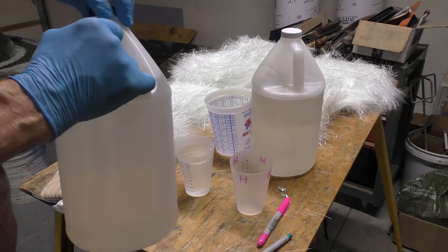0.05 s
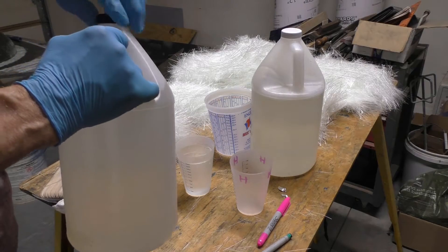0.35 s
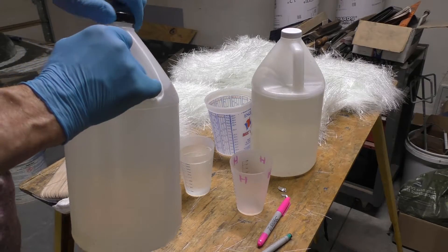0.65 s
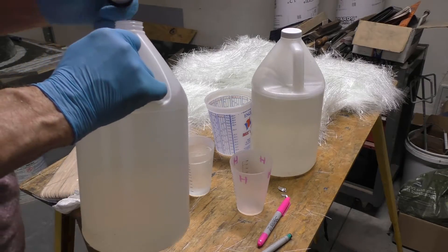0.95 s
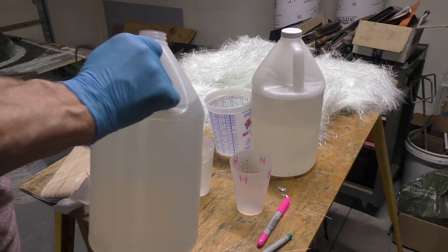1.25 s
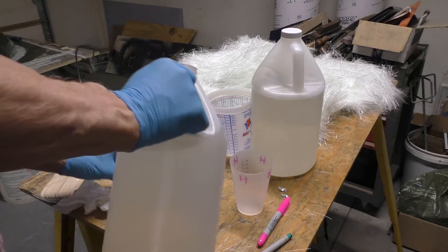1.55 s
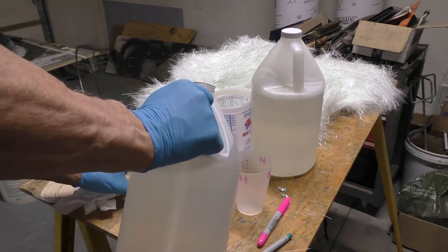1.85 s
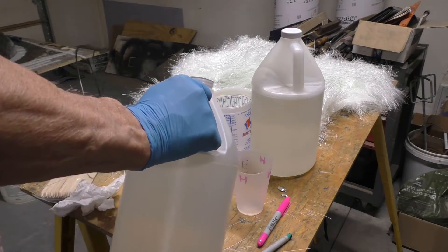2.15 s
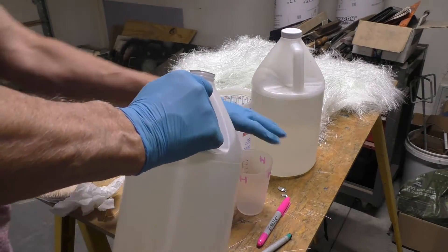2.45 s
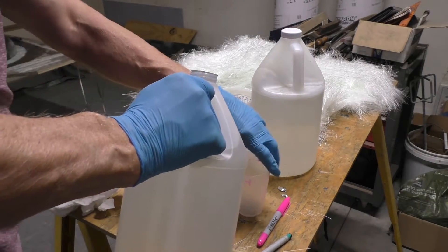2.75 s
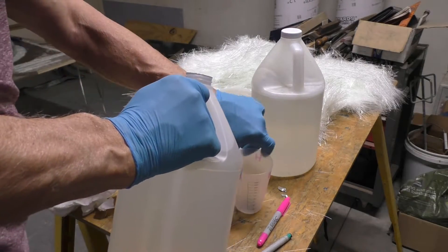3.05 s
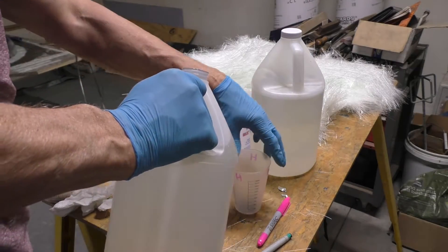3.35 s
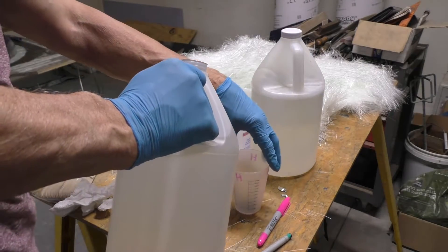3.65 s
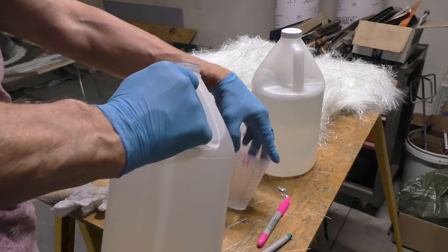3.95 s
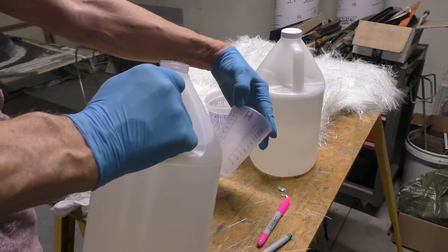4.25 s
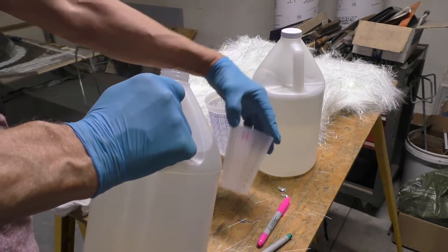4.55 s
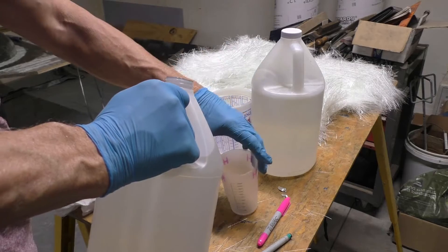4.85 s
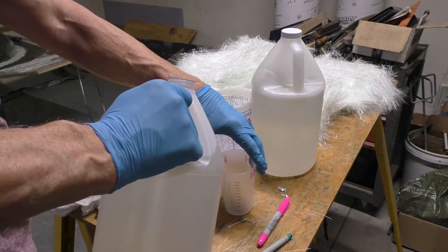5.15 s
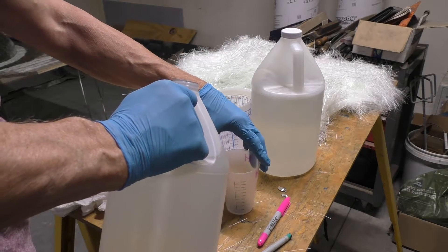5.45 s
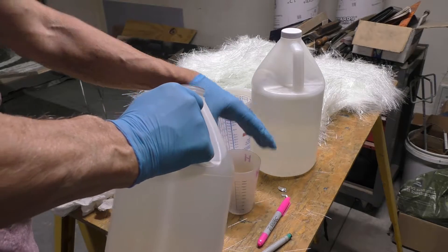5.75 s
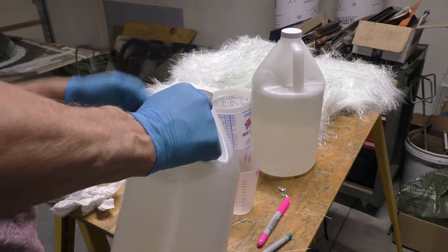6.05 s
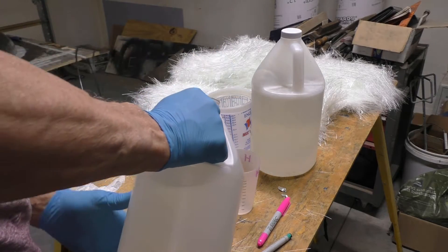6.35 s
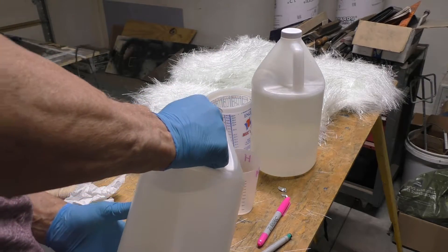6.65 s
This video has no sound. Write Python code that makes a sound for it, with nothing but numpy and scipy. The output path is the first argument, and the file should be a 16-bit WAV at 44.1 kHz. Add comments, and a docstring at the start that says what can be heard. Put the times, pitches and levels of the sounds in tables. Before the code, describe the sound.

Gloved hands softly rub and tap a plastic jug as its cap comes off. The cap clatters briefly on a wooden bench, and a glove gives a tiny squeak. A plastic cup scrapes over grit, bumps the jug, then lands with one firm, hollow knock, the loudest sound. Faint rubber crackles follow. It is all heard close by in a slightly echoing workshop with a low, steady hum.

```python
"""Jug and mixing cup on a workbench

Gloved hands take the cap off a plastic jug, rubbing round its neck, and drop it clattering on a
wooden bench. A mixing cup slides on fizzing grit, bumps the jug, is lifted and lands with one firm,
hollow knock. Each hit rings the object's modes; each scrape is a stream of tiny slips. Gloves crackle
and sleeves swish, while the workshop rings briefly over a bed of air and low hum."""
import sys
import numpy as np
from scipy import signal
from scipy.fft import rfft, irfft
from scipy.io import wavfile
from scipy.ndimage import uniform_filter1d

SR = 44100
rng = np.random.default_rng(int(sys.argv[2]) if len(sys.argv) > 2 else 0)


def output_pcm(signal):
    """Save a mono or channel-first signal as 16-bit PCM at the path in sys.argv[1].

    Samples are clipped to [-1, 1] before scaling.
    """
    pcm = np.clip(np.atleast_2d(signal).T, -1, 1) * 32767
    wavfile.write(sys.argv[1], SR, np.round(pcm).astype(np.int16))


N = 304290
TIME = np.arange(N) / SR

HOLLOW_HZ = 782  # the note of the cup's hollow
# The ring of the cup, cap and jug. Each row: pitch in Hz, level in dB, seconds to fall 60 dB.
CUP_MODES = [(250, -18, 0.052), (366, -9, 0.07), (460, -15, 0.042), (490, -12.5, .05), (930, -13, 0.019),
             (820, -9, 0.056), (HOLLOW_HZ, -0.45, 0.12), (810, -6.5, 0.089), (1200, -10, .05),
             (1180, -1.5, 0.02), (1281, -1.5, 0.032), (1420, -5, 0.0244), (1400, -12, 0.02),
             (2050, -7.5, 0.022), (3200, -19, .025), (3000, -6.5, .022), (3980, -13.5, .025),
             (3000, -18.5, 0.036)]
CAP_MODES = [(400, -8.5, 0.052), (547, -11.5, 0.04), (818, -4.5, 0.037), (1010, 5.5, 0.026),
             (1300, -1, 0.016), (1650, -5, 0.011), (2590, -1.5, 0.024), (4350, -20, .015)]
JUG_MODES = [(263, -15, 0.065), (350, -2.5, 0.066), (468, 1.5, 0.042), (541, -2.5, 0.052),
             (980, -3.5, 0.024), (1170, -13.5, 0.029), (1650, -7, 0.036), (2720, -20, .015)]
# Each object's body, a crowd of fast-dying modes. Each row: frequency in Hz, relative level in dB.
CUP_BODY = [(80, -22), (200, -9.5), (400, -0.5), (900, 8.5), (1600, -4.5), (2150, -4.5), (2700, -15.5),
            (3500, -1), (4300, -7), (5200, -10.5), (6200, -29.5), (8500, -14), (16000, -44.5)]
CAP_BODY = [(120, -30), (400, -8.5), (1200, 2.5), (2000, -7), (3000, -8.5), (4200, -13.5), (5300, -13.5),
            (6300, -23), (8000, -11.5), (16000, -42)]
JUG_BODY = [(100, 8), (280, 2.5), (600, -2), (1300, 1), (2200, -10), (3000, -3), (4600, -10), (6000, -31),
            (9000, -40), (16000, -28)]

# Hits. Each row: start in seconds, level in dB, contact time in milliseconds.
CUP_KNOCKS = [(3.1995, -43.5, 0.86), (3.915, -63, 0.34), (4.7953, -17, 0.51), (4.7962, -39, 0.12),
              (4.7978, -22.5, 0.81), (4.8032, -52, .072)]  # the cup's base meets the bench
CAP_DROPS = [(1.7988, -38.5, .18), (1.8028, -34, 0.35), (1.9418, -48.5, 0.12), (1.9468, -34, 0.29),
             (1.951, -43, 0.16), (2.0055, -43.5, 0.2), (2.013, -59, 0.4), (2.043, -45.5, 0.21)]  # the cap lands and rocks
JUG_TAPS = [(.0385, -46.5, 0.38), (.3965, -45.5, 0.29), (.6112, -49, 0.15), (.744, -52.5, 0.22),
            (.7695, -42, 0.15), (.772, -47.5, 1), (.787, -44.5, 0.89), (1.851, -32.5, 4.5),
            (2.378, -37, 3.6), (2.4165, -57, 0.35)]  # cap and fingers knock on the jug
# The cup bumps the jug and both sound. Each row: start in seconds, cup level in dB, jug level in dB.
NUDGES = [(2.907, -41, -38.5), (3.1955, -35, -50), (3.269, -52, -43), (3.329, -55, -45),
          (5.683, -43.5, -44.5)]
NUDGE_CUP_MS, NUDGE_JUG_MS = 1.3, 1.84  # contact times: the jug's wall gives more

# Pressed strokes. Each row: start in seconds, length in seconds, level in dB.
CUP_PUSHES = [(2.728, 0.071, -53.5), (2.774, 0.086, -41.5), (2.895, 0.091, -56), (3.745, 0.042, -58),
              (3.92, 0.049, -71.5)]
NECK_RUBS = [(.015, 0.18, -60.5), (.28, .04, -70), (.405, 0.091, -59.5), (.51, .21, -64), (.73, 0.043, -60),
             (.96, 0.18, -64.5)]  # the cap and fingers rub round the jug's neck
# Smooth swells. Each row: middle in seconds, length in seconds, level in dB.
GLOVE_RUBS = [(.14, 0.33, -68.5), (.48, 0.07, -69), (1.11, 0.3, -69), (2.395, 0.049, -62), (3.16, .1, -73),
              (4.1, 0.24, -74.5), (5.3, 0.09, -75), (5.57, 0.1, -75), (5.95, 0.13, -73), (6.02, 0.046, -65),
              (6.24, 0.15, -72.5)]
ARM_SWINGS = [(.8, 0.068, -74), (1.1, 0.17, -56), (1.33, 0.077, -59)]
RAG_BRUSHES = [(6.3, .09, -67.5), (6.53, 0.27, -76.5), (6.82, 0.073, -78)]
RUMBLE_SURGES = [(.05, .35, -55), (1.48, 0.33, -49), (2.6, 1.77, -57.5), (6.85, 0.37, -51)]
# Glove rubber snaps off plastic. Each row: start in seconds, level in dB, band centre in Hz.
GLOVE_SNAPS = [(0.041, -57.5, 7000), (0.499, -58, 9050), (2.377, -54, 3500), (2.427, -55, 3530),
               (3.144, -63, 10000), (3.166, -61, 10700), (3.181, -61, 10500), (3.27, -60.5, 6000),
               (3.916, -60.5, 4960), (4.987, -47.5, 5000), (5.018, -47, 5000), (5.3156, -60, 5000),
               (5.679, -62, 4000), (5.989, -61, 3500), (6.04, -62, 4500), (6.115, -59, 9500),
               (6.372, -63.5, 8000)]
# The glide of a glove's squeak on the jug handle. Each row: time in seconds, pitch in Hz, level in dB.
SQUEAK_GLIDE = [(2.410, 1995, -77), (2.416, 1790, -48.5), (2.422, 1480, -60), (2.428, 1870, -72),
                (2.436, 1900, -83.5)]

# EQ curves. Each row: frequency in Hz, relative level in dB.
GRIT_EQ = [(150, -22), (400, 8), (900, 1), (2000, 7.5), (3300, 1), (4300, 1.5), (5100, 3.5), (6000, -10),
           (8500, -7), (11000, -19), (13000, -26), (16000, -38)]  # grit under the cup
NECK_EQ = [(150, -9), (500, -5), (1500, -1), (2200, -3.5), (3200, -6), (4600, -8.5), (6000, -20),
           (9000, -18.5), (16000, -32.5)]  # rubbing round the jug's neck
GLOVE_EQ = [(200, -25.5), (900, -0.5), (1800, 1.5), (4000, 2), (5800, -7.5), (8000, -5), (11000, -11),
            (13000, -11), (16000, -27)]  # rubber on plastic
SLEEVE_EQ = [(100, -6), (250, -1.5), (400, 7), (560, 3.5), (750, -5.5), (1300, -15.5), (3000, -17),
             (8000, -35)]  # clothes swishing
RAG_EQ = [(200, -17), (800, 1), (1500, 5), (3000, -15.5), (6000, -17), (16000, -30)]  # fingers on a rag
AIR_EQ = [(20, 2.5), (40, -2), (75, -9.5), (108, -12), (160, -14.5), (270, -21.5), (370, -23.5),
          (650, -27.5), (1100, -31.5), (2700, -38.5), (5000, -43), (6200, -46), (9000, -49.5), (15500, -53)]  # steady room tone
RUMBLE_EQ = [(20, -46), (50, 6), (75, 6.5), (105, 1.5), (180, -16.5), (400, -57)]  # the low swells
ECHO_EQ = [(40, -2.5), (150, -3), (400, 0), (1400, -3.5), (2800, -1), (5000, 0.5), (8000, -3),
           (16000, -4.5)]  # the reverb tail
MIC_EQ = [(20, -1), (10000, 0.5), (12500, -3), (15700, -3.5)]  # the microphone's soft top

# The machine hum, one row for each pitch in HUM_HZ. Each row: level in dB, width of the waver in Hz.
HUM_LINES = [(-59, 3.3), (-59, 1.5)]
HUM_HZ = (70.5, 90.5)
# The workshop's reverb time. Each row: frequency in Hz, seconds to fall 60 dB.
ROOM_DECAY = [(100, 0.95), (300, 0.86), (800, 0.89), (1500, 0.72), (4000, 0.66), (8000, 0.72),
              (15000, 0.27)]


def cup_knocks():
    """The cup strikes the bench or the jug and its hollow rings."""
    knocks = CUP_KNOCKS + [(start, db, NUDGE_CUP_MS) for start, db, _ in NUDGES]
    return room(hits(knocks, CUP_MODES, CUP_BODY, body_db=1, body_t60=0.089), wet_db=-6)


def cup_slide(grit_db=-4, hollow_db=-1, hollow_t60=0.074, soft_hz=2500):
    """Slips under the sliding cup fizz and ring its modes, the hollow most of all."""
    friction = slips(per_s=6000, spread_db=-1)
    drag = signal.lfilter(*signal.butter(2, soft_hz, fs=SR), friction)  # each slip takes a moment
    walls = 0.5 * unit(signal.oaconvolve(drag, ring(CUP_MODES))[:N])
    hollow = amp(hollow_db) * unit(signal.oaconvolve(drag, ring([(HOLLOW_HZ, 0, hollow_t60)]))[:N])
    grit = amp(grit_db) * colour(friction, GRIT_EQ)
    push = strokes(CUP_PUSHES, attack_s=0.017, release_s=0.006, build_db=6.5)
    return room(push * (walls + hollow + grit), wet_db=-4.5)


def cap_clatter():
    """The cap clatters on the bench behind the jug, with plenty of room on it."""
    return room(hits(CAP_DROPS, CAP_MODES, CAP_BODY, body_db=5.5, body_t60=0.05), wet_db=-4)


def jug_handling():
    """The cap and fingers rub round the jug's neck and knock on it, close by; the cup nudges the wall."""
    rub = strokes(NECK_RUBS, attack_s=0.021, release_s=0.023, build_db=3.5)
    friction = rub * colour(slips(per_s=2200, spread_db=-3), NECK_EQ)
    taps = JUG_TAPS + [(start, db, NUDGE_JUG_MS) for start, _, db in NUDGES]
    knocks = hits(taps, JUG_MODES, JUG_BODY, body_db=2.5, body_t60=0.063)
    return room(knocks + friction, wet_db=-10.5)


def hands(snap_decay_s=0.0042, snap_octaves=1.18):
    """Gloves crackle, snap and squeak on plastic and brush a rag while the sleeves swish."""
    out = swells(GLOVE_RUBS) * colour(slips(per_s=1100, spread_db=1.5), GLOVE_EQ)
    out += swells(ARM_SWINGS) * noise(SLEEVE_EQ)
    out += swells(RAG_BRUSHES) * noise(RAG_EQ)
    t = TIME[:SR // 20]
    for start, db, centre_hz in GLOVE_SNAPS:
        snap_eq = [(hz, eq_db - 6 * (np.log2(hz / centre_hz) / snap_octaves) ** 2)
                   for hz, eq_db in GLOVE_EQ]
        add(out, start, amp(db) * np.exp(-t / snap_decay_s) * noise(snap_eq, len(t)))
    add(out, *squeak())
    return room(out, wet_db=-8.5)


def squeak(roughness=0.14):
    """Rubber sticks and slips at an unsteady rate; gives the start time and the chirp."""
    times, hz, db = np.transpose(SQUEAK_GLIDE)
    t = np.arange(times[0], times[-1], 1 / SR)
    jitter = unit(uniform_filter1d(rng.standard_normal(len(t)), size=20))
    pitch = np.interp(t, times, hz) * (1 + roughness * jitter)
    phase = 2 * np.pi * np.cumsum(pitch) / SR
    tone = np.sin(phase) + 0.48 * np.sin(2 * phase)
    return times[0], amp(np.interp(t, times, db)) * tone


def room_tone(air_db=-63, rumble_db=-3, boom_db=-2):
    """The bed: steady air, machine hum, and a rumble that swells together with the deeper hum note."""
    air = noise(AIR_EQ)
    above_hum = signal.sosfilt(signal.butter(4, 200, "high", fs=SR, output="sos"), air)
    air *= amp(air_db) / above_hum.std()  # air_db is the level above 200 Hz
    notes = [hum(hz, width_hz) for hz, (_, width_hz) in zip(HUM_HZ, HUM_LINES)]
    machine = sum(amp(db) * note for (db, _), note in zip(HUM_LINES, notes))
    rumble = amp(rumble_db) * noise(RUMBLE_EQ) + amp(boom_db) * notes[0]
    return air + machine + swells(RUMBLE_SURGES) * rumble


def hum(hz, width_hz, waver=0.56):
    """A low tone beats against a narrow band of noise, so its strength and pitch wander."""
    band = np.exp(-((np.fft.rfftfreq(N, 1 / SR) - hz) / width_hz) ** 2)
    drift = unit(irfft(rfft(rng.standard_normal(N)) * band, N))
    tone = np.sin(2 * np.pi * (hz * TIME + rng.random()))
    return unit(tone + waver * drift)


def room(x, wet_db):
    """Adds the workshop's reverb: scattered reflections, each band dying at its own speed."""
    slot = SR // 4000  # one reflection somewhere in each slot
    slot_starts = np.arange(SR // 110, SR - slot, slot)  # 9 ms of pre-delay
    echoes = np.zeros(SR)
    echoes[slot_starts + rng.integers(0, slot, len(slot_starts))] = rng.choice([-1, 1], len(slot_starts))
    hz, t, bands = signal.stft(echoes, SR, nperseg=256)
    decay = amp(-60 * t / curve(ROOM_DECAY, hz)[:, None])
    _, tail = signal.istft(bands * decay, SR, nperseg=256)
    tail = colour(flatten(tail), ECHO_EQ)
    return x + amp(wet_db) * signal.oaconvolve(x, tail / np.linalg.norm(tail))[:N]


def hits(rows, modes, body_eq, body_db, body_t60):
    """Contacts ring an object's modes and its dense body; the longer the contact, the duller the hit."""
    out, t, tone = np.zeros(N), TIME[:SR // 2], ring(modes)
    for start, db, contact_ms in rows:
        progress = np.clip(1000 * t[:SR // 100] / contact_ms, 0, 1)
        force = np.sin(np.pi * progress) ** 1.5
        body = amp(body_db - 60 * t / body_t60) * noise(body_eq, len(t))
        add(out, start, amp(db) * signal.oaconvolve(tone + body, force / force.sum()))
    return out


def ring(modes):
    """The dying modes of an object after a sharp tap."""
    t = TIME[:SR // 2]
    return sum(amp(db - 60 * t / t60) * np.cos(2 * np.pi * hz * t) for hz, db, t60 in modes)


def slips(per_s, spread_db):
    """Friction as a train of tiny slips of uneven size."""
    size = amp(spread_db * np.minimum(rng.exponential(1, N), 4)) * rng.standard_normal(N)
    return unit(size * (rng.random(N) < per_s / SR))


def strokes(rows, attack_s, release_s, build_db):
    """Envelope of pressed strokes: each grips quickly, bears down harder and stops short."""
    gain = np.zeros(N)
    for start, length, db in rows:
        t = TIME - start
        grip = np.clip(t / attack_s, 0, 1)
        pressure = amp(db - build_db * (1 - np.clip(t / length, 0, 1)))
        release = np.exp(-np.maximum(t - length, 0) / release_s)
        gain += grip * pressure * release
    return gain


def swells(rows):
    """Envelope of swells: each fades in and out in a smooth bell."""
    return sum(amp(db) * np.exp(-2 * ((TIME - middle) / length) ** 2) for middle, length, db in rows)


def flatten(x, width_hz=45):
    """Levels out broad peaks and dips, so that a diffuse sound favours no pitch."""
    spectrum = rfft(x, 2 * len(x))
    power = uniform_filter1d(abs(spectrum) ** 2, size=max(int(width_hz * 2 * len(x) / SR), 1))
    return irfft(spectrum / np.sqrt(abs(power) + 1e-12))[:len(x)]


def noise(eq, samples=N):
    """Noise shaped by an EQ curve, at rms 1."""
    return colour(rng.standard_normal(samples), eq)


def colour(x, eq):
    """Runs a sound through an EQ curve and scales it to rms 1."""
    gain = amp(curve(eq, np.fft.rfftfreq(len(x), 1 / SR)))
    return unit(irfft(rfft(x) * gain, len(x)))


def curve(points, hz):
    """Reads a table along log frequency."""
    point_hz, value = np.transpose(points)
    return np.interp(np.log(hz + 1), np.log(point_hz + 1), value)


def add(mix, start_s, sound):
    """Lays a sound into the mix."""
    part = mix[max(round(start_s * SR), 0):][:len(sound)]
    part += sound[:len(part)]


def amp(db):
    """Decibels to gain."""
    return 10 ** (np.asarray(db) / 20)


def unit(x):
    """Scales to rms 1."""
    return x / np.sqrt(np.mean(x ** 2) + 1e-20)


def scene():
    """The mono mix of props, hands and room tone."""
    return (jug_handling() + cap_clatter() + cup_knocks() + cup_slide() + hands() + room_tone())[None]


def record(dry):
    """The microphone softens the top, then a steep low-pass cuts at 15.7 kHz."""
    mic_gain = amp(curve(MIC_EQ, np.fft.rfftfreq(N, 1 / SR)))
    heard = irfft(rfft(dry) * mic_gain, N)
    low_pass = signal.firwin(511, 15700, window=("kaiser", 9), fs=SR)
    return signal.oaconvolve(heard, low_pass[None], "same")


dry = scene()
out = record(dry)
output_pcm(out)
```